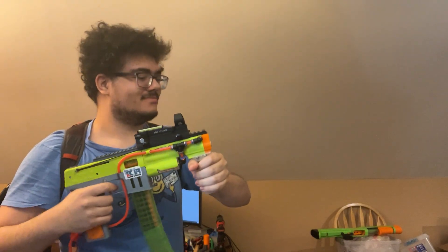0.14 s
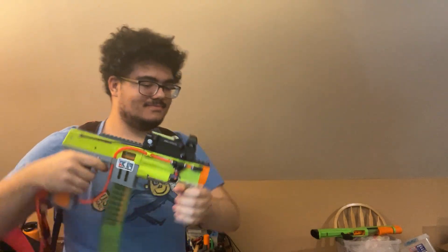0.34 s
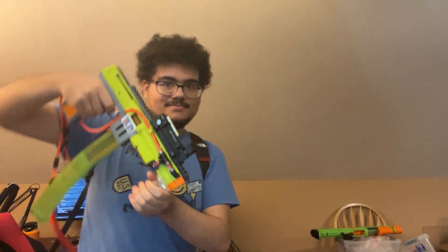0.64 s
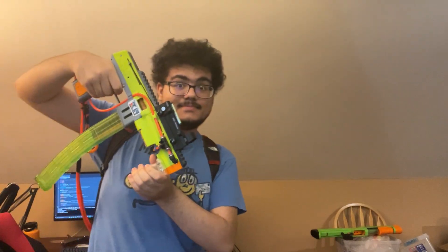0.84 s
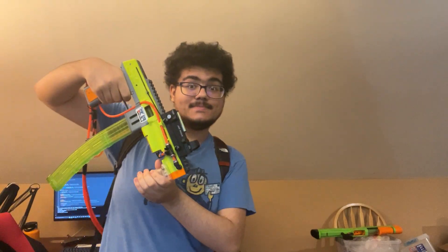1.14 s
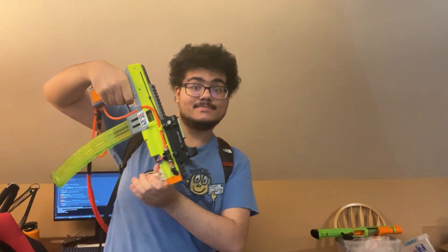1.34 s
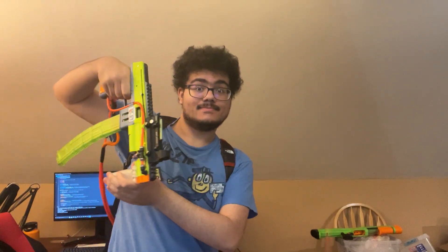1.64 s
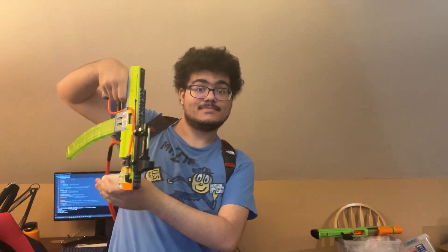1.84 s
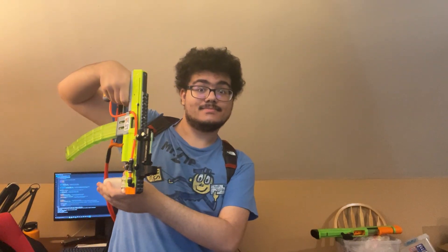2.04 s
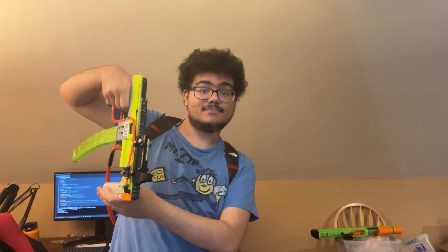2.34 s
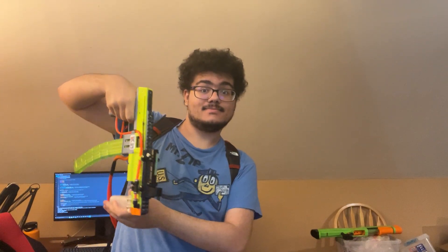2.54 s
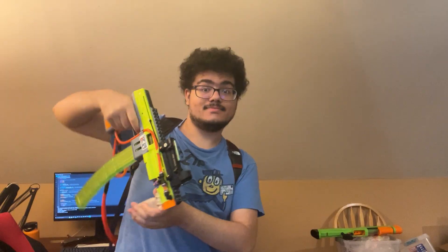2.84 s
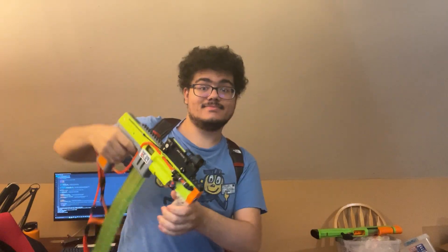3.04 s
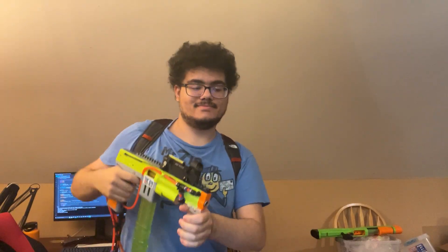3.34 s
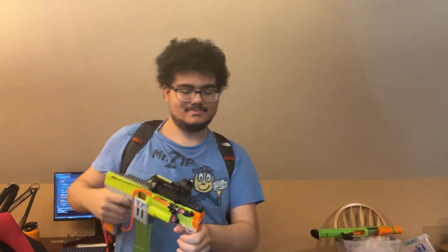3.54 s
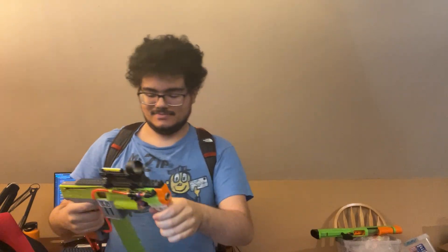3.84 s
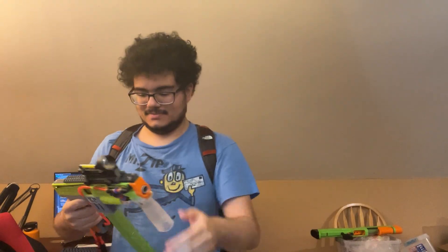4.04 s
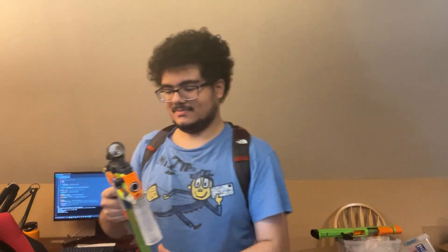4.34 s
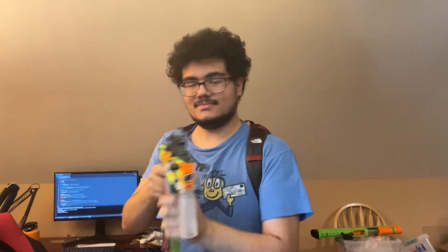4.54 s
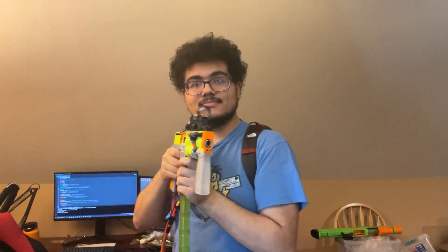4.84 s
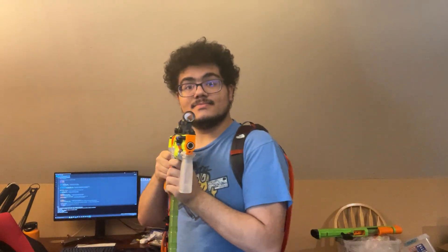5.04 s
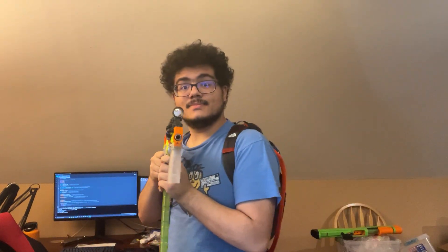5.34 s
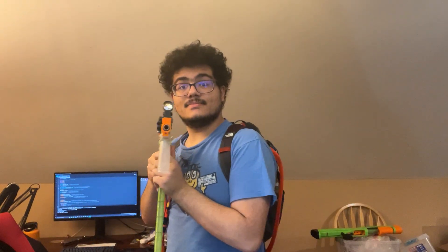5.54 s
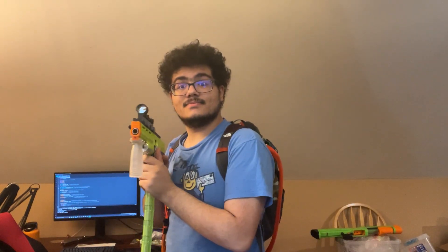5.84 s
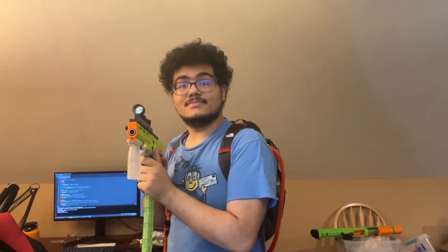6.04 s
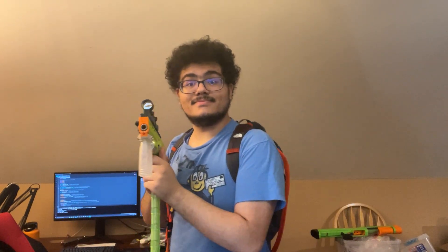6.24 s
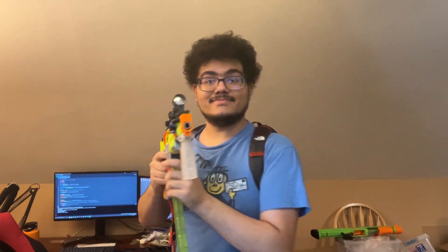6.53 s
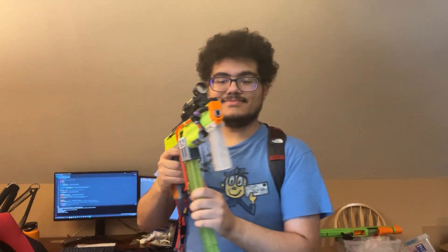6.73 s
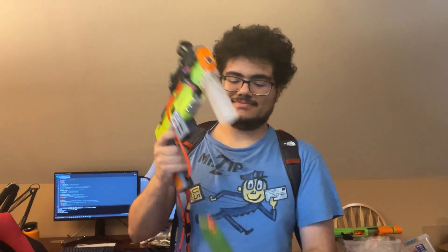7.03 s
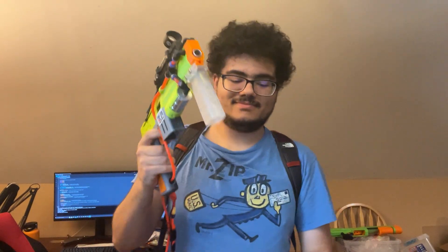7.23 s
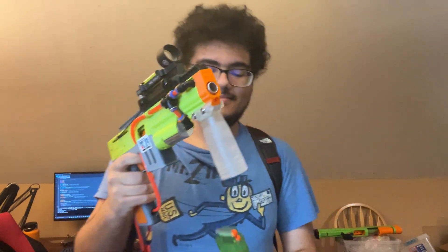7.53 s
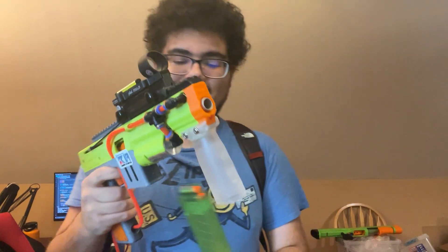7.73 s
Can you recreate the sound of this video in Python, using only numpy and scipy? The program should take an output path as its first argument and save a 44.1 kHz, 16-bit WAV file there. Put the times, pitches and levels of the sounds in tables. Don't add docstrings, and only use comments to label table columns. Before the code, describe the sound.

In a small furnished room, a compressed-air toy blaster fires about ten evenly spaced pops, each with a plastic bolt clack, a puff of air and a foam dart slapping a surface. A hollow box rings down, straps and cloth rustle, small clicks follow over faint hum. Then six more pops, the first drumming a box, and quiet handling ends it. Close stereo microphone, with loud shots slightly saturated.

```python
import sys
import numpy as np
from scipy import signal
from scipy.fft import rfft, irfft
from scipy.io import wavfile
from scipy.ndimage import uniform_filter1d

SR = 44100
rng = np.random.default_rng(int(sys.argv[2]) if len(sys.argv) > 2 else 0)


def linear_from_db(decibels):
    return 10 ** (np.asarray(decibels, float) / 20)


def to_wav(sig):
    pcm = np.clip(np.atleast_2d(sig), -1, 1) * 32767
    pcm = np.round(pcm).astype(np.int16)
    wavfile.write(sys.argv[1], SR, pcm.T)


N = 347508
PIECE = 6000
TURN_S = 4


def read(points, hz):
    f, value = np.transpose(points)
    return np.interp(np.log(hz + 1), np.log(f + 1), value)


def evened(x):
    return x / np.sqrt(np.mean(x ** 2) + 1e-20)


def add(mix, s, sound):
    part = mix[round(s * SR):][:len(sound)]
    part += sound[:len(part)]


def shaped(x, gain):
    return irfft(rfft(x) * gain(np.fft.rfftfreq(x.shape[-1], 1 / SR)), x.shape[-1])


def band(x, hz, width):
    return evened(signal.lfilter(*signal.iirpeak(hz, hz / width, SR), x))


def fade(t, rise, t60):
    t = np.maximum(t, 0)
    return (1 - np.exp(-t / rise)) * linear_from_db(-60 * t / t60)


def sine(hz, t):
    return np.sin(2 * np.pi * hz * t)


def swells(rows, rise):
    t = np.arange(0, N, 64) / SR
    gain = 0
    for s, db, t60 in rows:
        sixties = np.where(t < s, (s - t) / rise, (t - s) / t60)
        gain = gain + linear_from_db(db - 60 * np.minimum(sixties, 5))
    return np.interp(np.arange(N) / SR, t, gain)


def noise_pair():
    return rng.standard_normal((2, N))


# (center [s], length [s], depth [dB])
GATE_DIPS = [(.148, .14, 20), (.358, .1, 9), (.46, .06, 8), (.646, .1, 9), (3.6, .1, 8), (3.93, .3, 7),
             (4.165, .2, 16), (4.47, .1, 14), (4.745, .1, 18), (6.7, .1, 14), (6.876, .1, 12),
             (7.225, .09, 22), (7.456, .16, 11), (7.76, .08, 20), (7.82, .06, 12)]


def gate():
    t = np.arange(0, N, 64) / SR
    dips_db = sum(db * np.cos(np.pi * np.clip((t - s) / length, -.5, .5)) ** 2 for s, length, db in GATE_DIPS)
    return np.interp(np.arange(N) / SR, t, linear_from_db(-dips_db))


# (frequency [Hz], level [dB])
HUM_LINES = [(59.2, -13), (118.4, 1)]


def hum():
    t = np.arange(N) / SR
    lines = sum(linear_from_db(db) * sine(hz, t) for hz, db in HUM_LINES)
    waver = band(band(noise_pair(), 110, 70), 110, 120)
    return linear_from_db(-67) * (lines + .4 * waver) * gate()


def room_tone():
    return linear_from_db(-86) * band(noise_pair(), 250, 500)


# (peak time [s], low rustle [dB], bright rustle [dB], t60 [s])
RUSTLE = [(0.0, -60, -59, .35), (.118, -62, -75, .5), (.17, -70, -74, .9), (.24, -64, -78, .5),
          (.6, -69, -80, 1.5), (.3, -57, -76, .25), (.384, -59, -90, 1.1), (3.2, -40, -58, 1.1),
          (3.74, -56, -76, .25), (3.96, -64, -80, .3), (4.0, -72, -90, 3), (4.26, -69, -86, .5),
          (4.466, -63, -82, .4), (4.5, -70, -78, 1.2), (4.62, -79, -73, .5), (4.8, -70, -73, .5),
          (6.765, -68, -76, .2), (6.91, -56, -58, .35), (7.0, -75, -64, .3), (7.3, -90, -80, 1),
          (7.7, -88, -84, 3)]


def rustle():
    swell_s = .2
    lumps = linear_from_db(3.5 * evened(uniform_filter1d(noise_pair(), 900)))
    low = band(band(band(noise_pair(), 400, 400), 360, 600), 330, 300)
    low = linear_from_db(-1.5) * low * swells([(s, db, t60) for s, db, _, t60 in RUSTLE], swell_s)
    bright = band(band(noise_pair(), 3000, 5000), 4300, 9000)
    bright = linear_from_db(.8) * bright * swells([(s, db, t60) for s, _, db, t60 in RUSTLE], swell_s)
    return (low + bright) * lumps


# (time [s], level [dB], t60 [s])
RUMBLE = [
    (3.15, -45, .9),
    (3.4, -59.5, 4.5),
]


def rumble():
    t = np.arange(N) / SR
    low = band(band(noise_pair(), 170, 90), 170, 140)
    return low * swells(RUMBLE, rise=.3) * np.clip((4.9 - t) / .5, 0, 1)


# (frequency [Hz], width [Hz], level [dB], extra loss [dB/s])
BOX_MODES = [(552, 30, -6, -5), (400, 40, -4, 0), (458, 30, -3, 4), (620, 50, -8, -3), (694, 36, 3, 8),
             (813, 50, -4, -2), (1000, 120, -7, 4), (1050, 70, -27, -21), (1238, 50, -8, 4),
             (1330, 60, -7, 4), (1450, 90, -7, 20), (1750, 220, -10, 12), (2430, 120, -11, 14)]
# (time [s], level [dB], t60 [s])
BOX_HITS = [
    (3.0, -17, 1.1),
    (3.186, -24, .06),
    (3.35, -39, .1),
    (3.744, -47.5, .15),
    (3.76, -60, 2.4),
]


def box_ring():
    t = np.arange(N) / SR
    noise = noise_pair()
    modes = 0
    for hz, width, db, loss in BOX_MODES:
        mode = band(band(noise, hz, .7 * width), hz, 9 * width)
        modes = modes + linear_from_db(db - loss * np.clip(t - 3, 0, 2)) * mode
    return linear_from_db(-11) * modes * swells(BOX_HITS, rise=.04) * np.clip((4.85 - t) / .5, 0, 1)


# (frequency [Hz], t60 [s])
ROOM_T60 = [(60, 0.4), (250, .34), (900, .35), (2500, .35), (6000, .335), (14000, .28)]
# (delay [s], level [dB])
WALLS = [(.0085, -14), (.0155, -7), (.021, -12), (.027, -9)]


def room(x):
    taps = np.zeros((2, SR // 2))
    slots = np.arange(300, SR // 2 - 12, 12)
    at = slots + rng.integers(0, 12, (2, len(slots)))
    np.put_along_axis(taps, at, rng.choice([-1., 1.], at.shape), 1)
    hz, t, z = signal.stft(taps, SR, nperseg=256)
    tail = signal.istft(z * linear_from_db(-60 * t / read(ROOM_T60, hz)[:, None]), SR, nperseg=256)[1]
    tail *= linear_from_db(-7) / np.linalg.norm(tail[0])
    dull = signal.windows.hann(75)
    dull = dull / dull.sum()
    for s, db in WALLS:
        add(tail[0], s, linear_from_db(db) * dull)
        add(tail[1], s * 1.06, -linear_from_db(db) * dull)
    return signal.fftconvolve(x[None], tail, axes=1)[:, :N]


def knock(s, db, hz, t60):
    t = np.arange(PIECE) / SR
    mode = sine(hz, t) + .25 * sine(1.6 * hz, t)
    return s, linear_from_db(db - .7) * mode * fade(t, .0012, t60)


# (time [s], peak [dB], frequency [Hz])
KNOCKS = [(0.115, -54, 307), (0.381, -50, 533), (1.884, -28, 400), (2.361, -25, 230), (2.372, -29, 500),
          (2.86, -26, 170), (2.852, -31, 600), (3.343, -19, 445), (3.347, -24, 445), (5.135, -19, 250),
          (5.15, -24, 120), (6.455, -32, 380), (3.738, -41, 468), (3.764, -39.5, 154), (3.927, -48, 161.5),
          (4.254, -55.5, 143)]
# (time [s], peak [dB], frequency [Hz], t60 [s])
DRUMMING = [(5.1315, -8, 560, .06), (5.132, -8, 950, .06), (5.1365, -13, 1150, .05), (5.141, -12, 400, .05),
            (5.143, -10, 950, .05), (5.152, -14, 480, .05), (5.153, -12, 1000, .05), (5.158, -12, 780, .04),
            (5.166, -14, 450, .04), (5.167, -15, 1000, .05), (5.174, -14, 850, .04), (5.088, -22, 290, .06)]


def knocks(dry):
    for s, db, hz in KNOCKS:
        add(dry, *knock(s, db, hz, t60=.04))
    for row in DRUMMING:
        add(dry, *knock(*row))


def slap(s, db, hz):
    turns = (np.arange(400) - 200) / SR * hz
    half_width = .55
    return s - 200 / SR, linear_from_db(db) * np.cos(2 * np.pi * turns + 1) * np.exp(-(turns / half_width) ** 2)


# (peak time [s], peak [dB],
# frequency [Hz])
SLAPS = [(1.5322, -2, 1700), (1.7856, -6, 1800), (2.0317, -4, 2100), (2.5311, -5, 2200), (2.7805, -9, 1500),
         (3.0247, -7, 1100), (3.0278, -12, 600), (3.038, -11, 1300), (3.052, -8, 1300), (5.1655, -6, 800),
         (5.1342, -9, 700), (5.0082, -12, 800), (6.4535, -13, 1800), (6.931, -28, 4800), (6.766, -56, 3000),
         (6.842, -58, 3000), (3.7385, -48, 1800), (3.758, -46, 1300), (3.9585, -50, 3200),
         (3.856, -62, 4200), (4.165, -60, 3600), (4.125, -52, 1600)]


def slaps(dry):
    for row in SLAPS:
        add(dry, *slap(*row))


# (frequency [Hz], density [dB per Hz])
AIR_SPECTRUM = [(100, -30), (300, -13), (900, -7), (1350, -4.5), (2500, -7), (4500, -11.5), (6500, -11),
                (8500, -13), (11000, -15), (13000, -19), (16000, -19)]


def air_jet():
    air = evened(shaped(rng.standard_normal(N), lambda f: linear_from_db(read(AIR_SPECTRUM, f))))
    spit_db = 3.5 * evened(uniform_filter1d(rng.standard_normal(N), size=30))
    return evened(air * linear_from_db(spit_db))


def piece(air, s):
    return air[round(s * SR):][:PIECE]


def tap(row, noise, width, soft, body_db):
    s, db, hz, treble_db, t60 = row
    t = np.arange(len(noise)) / SR
    t60 = t60 + .004
    body = band(noise, hz, width * hz)
    bright = evened(shaped(noise, lambda f: 1 / (1 + (4500 / (f + 1)) ** 4)))
    return s - .001, (linear_from_db(db + body_db) * body + linear_from_db(treble_db + 7) * bright) * fade(t, soft * t60, t60)


# (time [s], peak [dB], center [Hz], treble [dB])
HANDLING = [(0.282, -41.5, 956, -74), (0.591, -57, 3730, -54), (3.548, -51, 842, -52),
            (4.123, -52, 1080, -67.5), (4.431, -42.5, 1063, -61), (4.451, -35, 987, -56),
            (4.607, -43.5, 977, -64.5), (4.795, -41, 988, -60), (4.807, -38, 980, -59),
            (6.766, -46, 910, -68), (6.842, -53, 1300, -73), (6.866, -46, 848, -53), (6.93, -30, 5200, -31),
            (7.302, -68, 3890, -65), (7.61, -72, 2880, -91), (7.707, -71, 1720, -73.5),
            (7.831, -26.5, 1276, -52), (7.844, -30, 1270, -50)]
# (time [s], peak [dB], center [Hz], treble [dB], t60 [s])
TRIGGER = [
    (.7265, -27, 1100, -38, .08),
    (4.992, -29, 900, -44, .12),
]
# (time [s], peak [dB], center [Hz], treble [dB], t60 [s])
SETTLING = [(.002, -43, 720, -50, .15), (.29, -48, 2200, -70, .15), (.53, -68, 3000, -70, .03),
            (.62, -66, 3000, -66, .04), (.882, -20, 3500, -25, .09), (1.059, -19, 3500, -27, .09),
            (3.02, -19, 1300, -40, .25), (3.07, -21, 1500, -40, .3), (3.96, -52, 3000, -68, .03),
            (4.455, -39, 1800, -55, .08), (4.66, -66, 3500, -64, .02), (4.711, -62, 900, -62, .03),
            (4.81, -48, 1900, -56, .06), (4.925, -66, 3500, -66, .02), (6.892, -38, 880, -50, .06),
            (6.91, -36, 900, -48, .07), (6.935, -37, 950, -58, .2), (6.94, -44, 2000, -54, .15),
            (7.835, -42, 330, -56, .12), (7.83, -41, 2000, -58, .1)]
# (time [s], peak [dB], center [Hz], treble [dB], t60 [s])
RATTLES = [(1.543, -15, 2400, -28, .12), (1.563, -22, 2200, -24, .05), (1.787, -10, 3300, -16, .045),
           (2.781, -10, 950, -22, .06), (2.545, -18, 3500, -26, .05), (2.575, -20, 4000, -26, .05),
           (2.033, -14, 2500, -26, .05), (5.523, -18, 2600, -28, .04)]
# (time [s], level [dB])
TICKS = [(4.6847, -58), (4.7116, -48), (4.7336, -52), (4.7665, -59), (4.8723, -51), (4.905, -60),
         (4.9256, -55), (4.936, -54), (4.973, -53), (4.9855, -49)]


def handling(dry, air):
    rows = [(*row, .05) for row in HANDLING]
    rows += [*TRIGGER, *SETTLING, *RATTLES]
    rows += [(s, db - 8, 5000, db - 4, .008) for s, db in TICKS]
    for row in rows:
        add(dry, *tap(row, piece(air, row[0]), width=.3, soft=.07, body_db=-4))


# (time [s], peak [dB], center [Hz], treble [dB])
STRIKES = [(0.7594, -28, 2430, -26), (0.9039, -2, 3600, -23), (1.0824, -6, 3600, -14),
           (1.288, -7, 3440, -18), (1.5315, -20, 1700, -28), (1.5805, -11, 3600, -15),
           (1.7849, -14, 1980, -24), (1.8794, -30, 1167, -49), (2.0313, -18, 2200, -26),
           (2.0477, -8.5, 4610, -17), (2.2872, -5, 4175, -21), (2.5308, -20, 2360, -20),
           (2.5621, -9, 3690, -19), (2.5994, -23, 1320, -44), (2.7797, -16, 2000, -15),
           (2.7944, -7, 3470, -17), (3.044, -8, 3700, -18), (5.0878, -14, 3390, -40),
           (5.0963, -9, 3170, -40.5), (5.1744, -17, 3436, -24), (5.1921, -8, 3630, -12.5),
           (5.2874, -12.5, 3804, -18), (5.5368, -10, 3430, -17.5), (5.7867, -13, 2210, -20),
           (6.0369, -19, 3180, -21), (6.2871, -10, 4830, -21)]


def strikes(dry, air):
    for row in STRIKES:
        add(dry, *tap((*row, .022), piece(air, row[0]), width=.7, soft=.025, body_db=-4.5))


def grip(s):
    return 1 + .07 * np.sin(17 * s)


# (frequency [Hz], level [dB], t60 [s])
BOLT_MODES = [(835, -1, .026), (1700, -4, .035), (2500, -4, .02), (3400, -8.5, 0.023)]


def bolt(s, clack_db, air, tune, ring_db, seat_db, seat_delay_s):
    t = np.arange(len(air)) / SR
    ring = sum(linear_from_db(db) * sine(hz * tune, t) * fade(t, .00096, t60) for hz, db, t60 in BOLT_MODES)
    clack = linear_from_db(clack_db - 12) * air * fade(t, .0008, .047)
    slide_gain = np.clip(t / .0025, 0, 1) * np.clip((seat_delay_s + .012 - t) / .0055, 0, 1)
    slide = linear_from_db(clack_db - 16) * air * slide_gain
    seat_gain = np.exp(-((t - seat_delay_s - .001) / .0042) ** 2)
    seat = linear_from_db(seat_db - 1.6) * np.diff(air, prepend=0) * seat_gain
    return s - .001, linear_from_db(clack_db + ring_db + 3) * ring + clack + slide + seat


# (time [s], clack [dB])
BOLTS = [(0.9344, -9.5), (1.183, -8), (1.4339, -7.5), (1.6834, -8.5), (1.935, -9), (2.1839, -10),
         (2.4332, -11), (2.6838, -11), (2.9332, -9.5), (3.1842, -10.5), (5.2047, -9), (5.453, -16),
         (5.7029, -12.5), (5.9528, -14.5), (6.2023, -14), (6.4519, -12.5)]


def bolts(dry, air):
    down = dict(ring_db=-6.5, seat_db=-18, seat_delay_s=.0185)
    ahead = dict(ring_db=-10, seat_db=-21, seat_delay_s=.0145)
    for s, clack_db in BOLTS:
        aim, hands = (down, 1) if s < TURN_S else (ahead, .68)
        add(dry, *bolt(s, clack_db, piece(air, s), grip(s) ** .3 * hands, **aim))
        hiss_db = clack_db - 24
        approach = (s - .009, hiss_db, 1500, hiss_db - 12, .1)
        add(dry, *tap(approach, piece(air, s - .1), width=1.5, soft=.05, body_db=0))


def shot(row, air, grip, barrel_hz, barrel_t60, shell_hz, shell_t60, lead_s, blow_s, rise_s, thump_db, snap_db,
         boom_db, knock_db, crack_db, leak_db, hold_s):
    s, strength_db, blow_db = row
    t = np.arange(len(air)) / SR
    u = t - lead_s
    shell_hz, barrel_hz = shell_hz * grip, barrel_hz / grip

    snap = linear_from_db(snap_db) * sine(1000, t) * fade(t, .0003, .01)
    leak_gain = np.clip(t / .004, 0, 1) * np.where(u < 0, 1, linear_from_db(-60 * u / .015))
    leak = linear_from_db(strength_db + leak_db) * air * leak_gain

    column_s = u + .0012 * (1 - np.exp(-np.maximum(u, 0) / .003))
    boom = linear_from_db(strength_db + boom_db + 11) * sine(barrel_hz, column_s) * fade(u, .00044, barrel_t60)

    shell = sine(shell_hz, u) + .45 * sine(1.7 * shell_hz, u) + .55 * sine(2.8 * shell_hz, u)
    shell = -linear_from_db(strength_db + knock_db + 7.5) * shell * fade(u, .00014, shell_t60)

    crack_gain = fade(u + rise_s, rise_s, .024) * np.clip((hold_s - u) / .002, .3, 1)
    crack = linear_from_db(strength_db + crack_db + 7.5) * air * crack_gain
    blast = (1 - u / .00012) * np.exp(-np.abs(u) / .00012) * (u >= 0)
    blast = linear_from_db(strength_db + crack_db + 5) * blast

    chest = ((56, .6), (80, .9), (108, .8), (140, 1.3), (175, 1.1), (215, 1.1))  # (Hz, share)
    thump = sum(share * sine(hz * grip, u) for hz, share in chest)
    thump = linear_from_db(strength_db + thump_db) * thump * fade(u, .004, .08)

    blow_gain = np.clip(u / .0097, 0, 1) / (1 + np.exp(np.clip((u - blow_s) / .008, -30, 30)))
    blowoff = linear_from_db(blow_db + 3.4) * air * blow_gain
    return s - lead_s, snap + leak + boom + shell + crack + blast + thump + blowoff


AIM_DOWN = dict(barrel_hz=295, barrel_t60=.028, shell_hz=880, shell_t60=.016, lead_s=.0062, blow_s=.065,
                rise_s=.0004, thump_db=-25.5, snap_db=-14,
                boom_db=-22, knock_db=-12.5, crack_db=-15, leak_db=-17.5, hold_s=.0055)
AIM_FIRST = dict(barrel_hz=270, barrel_t60=.04, shell_hz=720, shell_t60=.01, lead_s=.0058, blow_s=.034,
                 rise_s=.0008, thump_db=-21, snap_db=-9,
                 boom_db=-23, knock_db=-13, crack_db=-15.5, leak_db=-20, hold_s=.004)
AIM_AHEAD = dict(barrel_hz=290, barrel_t60=.036, shell_hz=620, shell_t60=.012, lead_s=.0052, blow_s=.034,
                 rise_s=.0008, thump_db=-19, snap_db=-7,
                 boom_db=-19, knock_db=-18.5, crack_db=-14.5, leak_db=-18.5, hold_s=.004)
# (time [s], pop strength [dB], blow-off [dB])
SHOTS_DOWN = [(.7428, 1.5, -30.5), (.9925, 0, -30), (1.2422, 0, -28), (1.4922, 0, -27), (1.7421, -1, -25),
              (1.9921, 0, -26.5), (2.2424, 0.5, -25), (2.4923, 0, -27), (2.7423, -1.5, -24.5),
              (2.9917, 0.5, -28)]
SHOT_FIRST = [(5.0135, 0, -29.5)]
SHOTS_AHEAD = [(5.261, -1, -32), (5.511, 1, -33), (5.761, 0, -34), (6.011, 0, -34), (6.261, 0.5, -33)]


def shots(dry, air):
    for rows, aim in ((SHOTS_DOWN, AIM_DOWN), (SHOT_FIRST, AIM_FIRST), (SHOTS_AHEAD, AIM_AHEAD)):
        for row in rows:
            add(dry, *shot(row, piece(air, row[0]), grip(row[0]), **aim))


# (level [dB], frequency [Hz])
MUZZLE = [(-11, 1000), (-14, 3200), (-17, 9000)]


def muzzle_fronts(dry):
    for s, strength_db, _ in [*SHOTS_DOWN, *SHOT_FIRST, *SHOTS_AHEAD]:
        for db, hz in MUZZLE:
            add(dry, *slap(s, strength_db + db, hz))
    for s, _, _ in SHOTS_AHEAD:
        add(dry, *knock(s + .0135, -15, 350, t60=.05))


def scene():
    hits, close = np.zeros(N), np.zeros(N)
    air = air_jet()
    handling(hits, air)
    strikes(hits, air)
    bolts(hits, air)
    shots(hits, air)
    knocks(close)
    slaps(close)
    muzzle_fronts(close)

    turn = 2 * np.pi * .9 * np.arange(N) / SR
    sent = hits + linear_from_db(-8) * close
    wet = room(sent * np.cos(1.7 * turn)) + room(sent * np.sin(1.7 * turn))
    wet = wet + room_tone() + hum() + rustle() + rumble() + box_ring()

    late = lambda f: np.exp(-2j * np.pi * f * .002)
    near = shaped(hits, lambda f: late(f) * np.exp(2.4j * np.sin(f / 260) + 1.2j * np.sin(f / 150)))
    far = shaped(hits, lambda f: late(f) * np.exp(2.1j * np.cos(f / 210) + 1.2j * np.sin(f / 130)))
    scattered = np.cos(turn) * near + np.sin(turn) * far
    return np.array([hits + close + wet[0], scattered + .3 * close + wet[1]])


def band_limit(x):
    return signal.sosfilt(signal.butter(12, 17130, fs=SR, output="sos"), x)


# (frequency [Hz], left-right likeness [0-1])
LIKENESS = [(60, .88), (350, .62), (1200, .42), (2800, .3), (4200, .45), (5600, .15), (7000, .8),
            (8200, .98), (15000, .99)]
# (frequency [Hz], left over right [dB])
BALANCE_LR = [(60, .5), (150, 2.4), (350, 1.8), (800, .4), (2000, 0)]


def record(dry):
    lag_s, lag_from_hz = .000196, 5850
    same = lambda f: np.clip(read(LIKENESS, f), 0, 1)
    late = lambda f: np.exp(-2j * np.pi * lag_s * np.maximum(f - lag_from_hz, 0))
    shared = shaped(dry[0], lambda f: same(f) * late(f))
    own = shaped(dry[1], lambda f: np.sqrt(1 - same(f) ** 2))
    right = shaped(shared + own, lambda f: linear_from_db(-read(BALANCE_LR, f)))
    ports = np.tanh(np.array([dry[0], right]) / 1.05) * 1.05
    ports = signal.sosfilt(signal.butter(2, 48, "high", fs=SR, output="sos"), ports)
    edge = signal.firwin(511, 15900, window=("kaiser", 7), fs=SR)
    ports = signal.oaconvolve(ports, edge[None], "same")
    return band_limit(ports)


dry = scene()
out = record(dry)
to_wav(out)
```